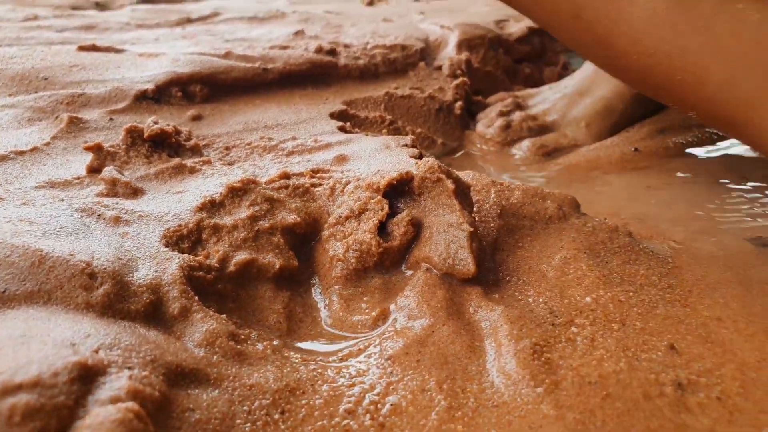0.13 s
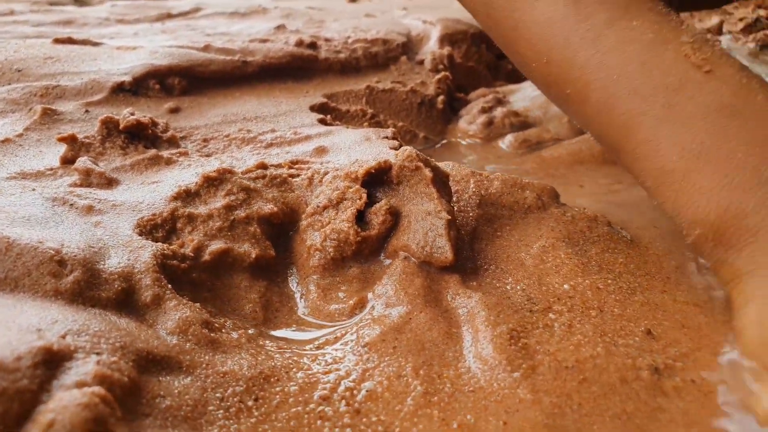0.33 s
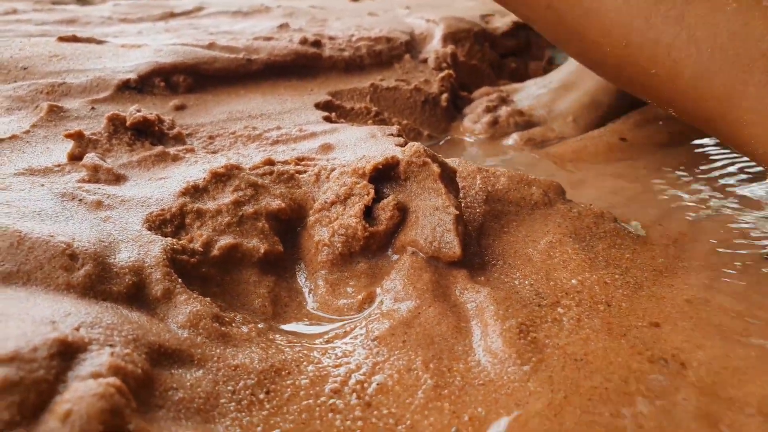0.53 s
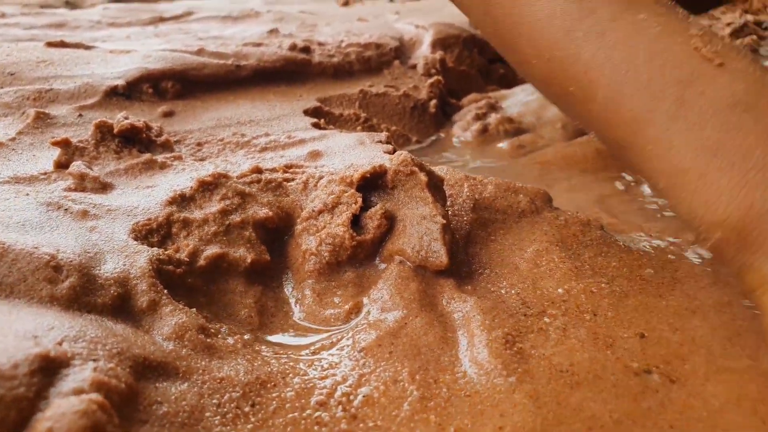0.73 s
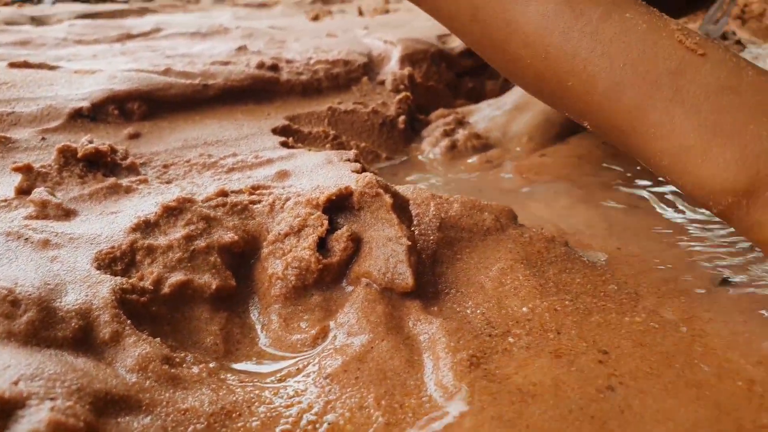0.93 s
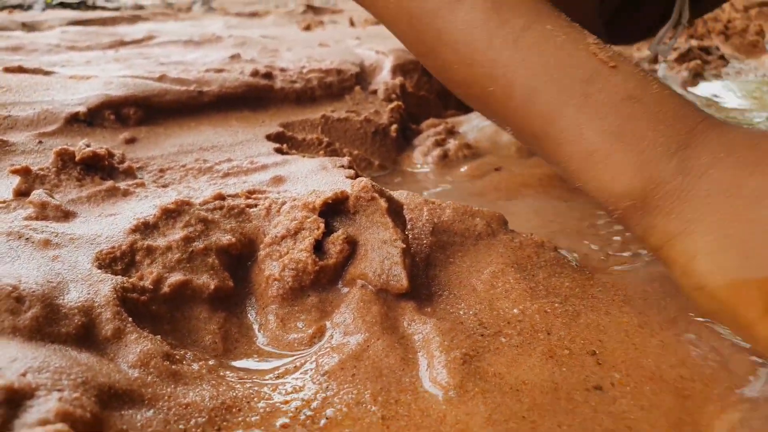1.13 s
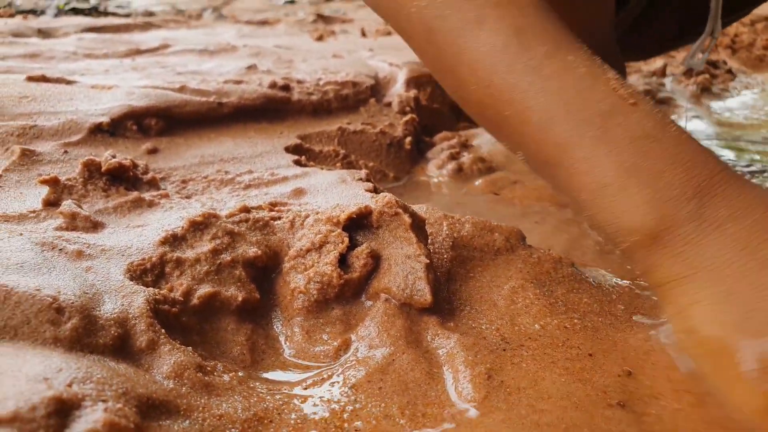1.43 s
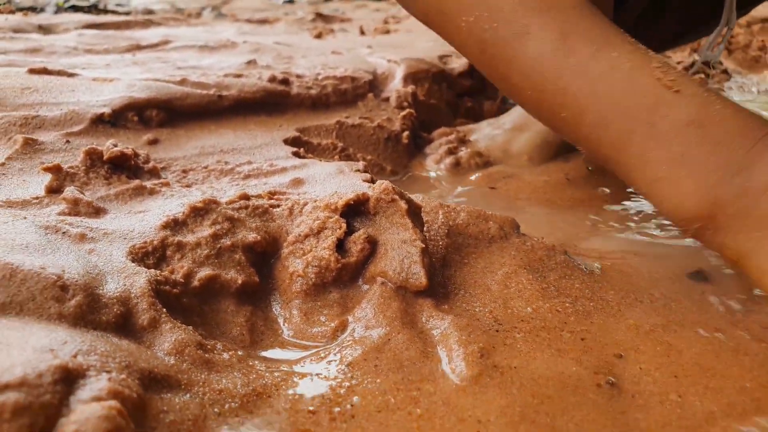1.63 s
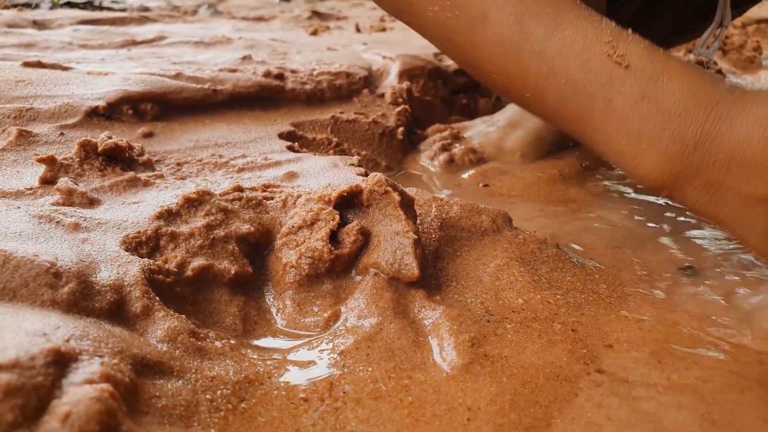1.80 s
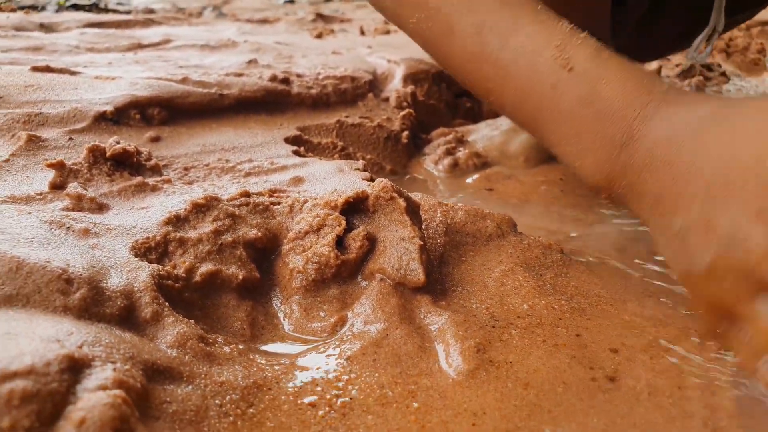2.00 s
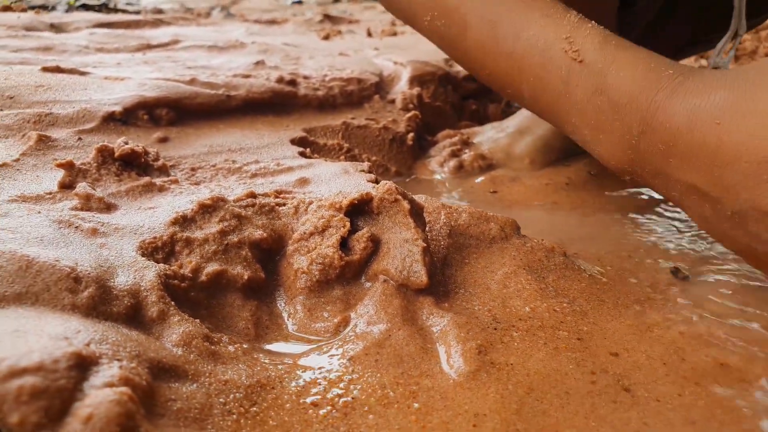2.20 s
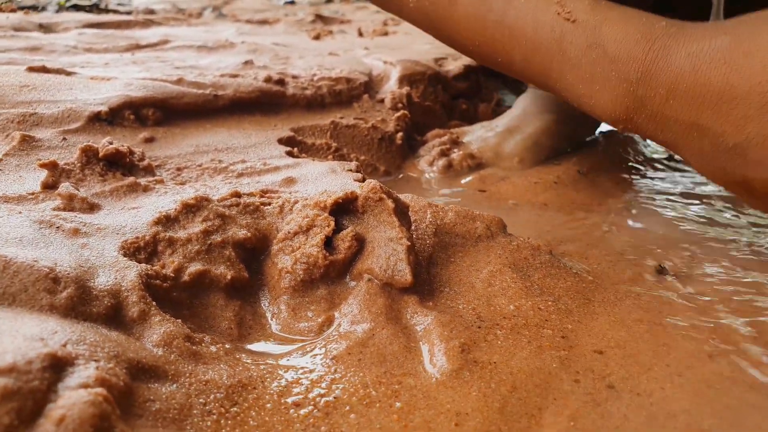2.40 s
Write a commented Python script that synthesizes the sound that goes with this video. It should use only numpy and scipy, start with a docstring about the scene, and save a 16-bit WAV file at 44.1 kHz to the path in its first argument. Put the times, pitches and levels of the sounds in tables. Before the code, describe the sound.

Hands scooping waterlogged sand, with sharp wet pops, squelches and sloshes over a steady insect drone

```python
"""Hands scooping waterlogged sand

Hands scoop to the right of a two-port microphone. Air pockets pop and gurgle as gliding sines, water films
tick as short noise bursts, and small bubbles, crackle and slosh follow each stroke. Near sounds reach the left
port late and scatter briefly. Insects drone all round: sparse clicks ringing in the singers' bands, noise bands
above. Behind lie coloured-noise hiss, a wavering low far rumble and one brief far swish.
"""
import sys
import numpy as np
from scipy import signal
from scipy.fft import rfft, irfft, next_fast_len
from scipy.io import wavfile
from scipy.ndimage import uniform_filter1d, map_coordinates

SR = 44100
rng = np.random.default_rng(int(sys.argv[2]) if len(sys.argv) > 2 else 0)


def field_ratio(decibels):
    """Amplitude ratio for a level in dB (20 dB per decade); scalars and array-likes work."""
    return 10 ** (np.asarray(decibels, dtype=float) / 20)


def master(y):
    """Save y as 16-bit WAV."""
    cut = np.clip(np.atleast_2d(y).T, -1, 1)
    pcm = np.round(cut * 32767)  # scale
    wavfile.write(sys.argv[1], SR, pcm.astype(np.int16))


N = 112454
LAG_SCATTER_S, GRAIN_SCATTER_DB = 0.00008, 2  # left port against right, from grain to grain


def unit(x):
    """Scaled to rms 1."""
    return x / np.sqrt(np.mean(x ** 2) + 1e-20)


def along(points, hz, ends=None):
    """(Hz, value) points interpolated on a log frequency axis."""
    f, v = np.transpose(points)
    return np.interp(np.log(hz + 1), np.log(f + 1), v, ends, ends)


def curves(rows):
    """One value per sample for each column after the time."""
    s, *cols = np.transpose(rows)
    return [np.interp(np.arange(N) / SR, s, c) for c in cols]


def wobble(rate_hz):
    """A smooth random curve with rate_hz knots a second."""
    knots = rng.standard_normal(int(N * rate_hz / SR) + 4)
    return map_coordinates(knots, [np.arange(N) * rate_hz / SR])


def filtered(x, response):
    """x through a response given as a function of Hz."""
    m = next_fast_len(N + 8192)
    return irfft(rfft(x, m) * response(np.fft.rfftfreq(m, 1 / SR)), m)[..., :N]


def coloured(x, spectrum):
    """x through a (Hz, dB) spectrum closed at both ends."""
    return filtered(x, lambda hz: field_ratio(along(spectrum, hz, ends=-120)))


def sides(left_db):
    """Left and right gains of constant total power, left_db apart."""
    g = field_ratio(left_db)
    return np.array([g, np.ones_like(g)]) * np.sqrt(2 / (1 + g * g))


def pair(x, alike, left_db):
    """Two unrelated signals blended to a likeness and a balance, both by frequency."""
    def turn(hz):
        return np.arccos(np.clip(along(alike, hz), -1, 1)) / 2
    a, b = filtered(x, lambda hz: np.array([np.cos(turn(hz)), np.sin(turn(hz))]))
    return unit(filtered(np.array([a + b, a - b]), lambda hz: sides(along(left_db, hz))))


def place(s, grains):
    """Rows of samples summed at their times."""
    at = np.round(np.asarray(s) * SR).astype(int)[:, None] + np.arange(grains.shape[1])
    return np.bincount(at.ravel(), grains.ravel(), N)[:N]


def ports(s, grains):
    """Each grain reaches the left port at its own level and lag; both ports start LAG_SCATTER_S late."""
    lag, level = rng.uniform(-1, 1, (2, len(s)))
    left = place(s + LAG_SCATTER_S * (1 + lag), grains * field_ratio(GRAIN_SCATTER_DB * level)[:, None])
    right = place(s + LAG_SCATTER_S, grains)
    return np.array([left, right])


POP_BEND = 1.33  # exponent above 1: glides steepen late
POP_RISE_CYCLES, POP_CRACK_DB, POP_CRACK_S = 0.38, -22.5, 0.00063
POP_SHAPE, POP_ROUGH = 1.244, 0.36  # decay exponent and flutter depth of short pops
# long gurgles hold, cleaner, and stop short
POP_HOLD_FROM_S, POP_HOLD_FULL_S, POP_HOLD_SHAPE, POP_HOLD_ROUGH = 0.005, 0.011, 3.2, 0.15


def bubbles(start_hz, end_hz, length_s, size):
    """Gliding, uneven sines that start fast and fade over their length, each with a short dull crack."""
    t = np.arange(size)[None] / SR
    start = np.asarray(start_hz)[:, None]
    end = np.asarray(end_hz)[:, None]
    life = np.clip(length_s, 3e-4, 1)[:, None]
    glide = np.minimum(t / life, 1.2) ** POP_BEND
    cycles = np.cumsum(start + (end - start) * glide, 1) / SR
    held = np.clip((life - POP_HOLD_FROM_S) / (POP_HOLD_FULL_S - POP_HOLD_FROM_S), 0, 1)
    rough = POP_ROUGH + (POP_HOLD_ROUGH - POP_ROUGH) * held
    shape = POP_SHAPE + (POP_HOLD_SHAPE - POP_SHAPE) * held
    slow_noise = unit(uniform_filter1d(rng.standard_normal(cycles.shape), size=40, axis=1))
    flutter = 1 + rough * np.minimum(t / 0.003, 1) * slow_noise
    rise = 1 - np.exp(-cycles / POP_RISE_CYCLES)
    fade = np.exp(-1.4 * (t / life) ** shape)
    ring = np.sin(2 * np.pi * cycles) * fade * rise
    dull_noise = uniform_filter1d(rng.standard_normal(cycles.shape), size=5, axis=1)
    crack = dull_noise * np.exp(-t / POP_CRACK_S)
    return ring * flutter + field_ratio(POP_CRACK_DB) * crack


# Air pockets bursting. Each row: start in seconds, start pitch in Hz, end pitch in Hz, level in dB,
# length in seconds.
AIR_POCKETS = [(0.108, 318, 300, -44, 0.02), (0.2207, 1563, 2320, -32, 0.02),
               (0.245, 4400, 4470, -31.5, 0.0021), (0.2587, 4560, 4500, -26, 0.0047),
               (0.2832, 1720, 2487, -22.5, 0.018), (0.2883, 4860, 4250, -15.5, 0.0015),
               (0.301, 4100, 4420, -27, 0.002), (0.381, 2130, 2150, -33.5, 0.0024),
               (0.4353, 2790, 2250, -0.5, 0.00077), (0.4359, 6115, 5840, -11.5, 0.0067),
               (0.4381, 2700, 2326, -13, 0.0022), (0.4394, 3920, 3280, -6.5, 0.0014),
               (0.4398, 4920, 4740, -13.5, 0.0027), (0.446, 5860, 5370, -5.5, 0.0013),
               (0.4466, 2650, 2350, -21.5, 0.0032), (0.512, 3200, 2660, -16, 0.0018),
               (0.5165, 2490, 1900, -26.5, 0.0041), (0.52, 4200, 4270, -23.5, 0.0018),
               (0.539, 3570, 4080, -30.5, 0.0045), (0.545, 6200, 5650, -19.5, 0.0025),
               (0.566, 3400, 3500, -36, 0.0047), (0.5965, 3340, 3460, -29.5, 0.0031),
               (0.6009, 6850, 6300, -23.5, 0.0032), (0.614, 6020, 5260, -11.5, 0.0015),
               (0.641, 2060, 1980, -29.5, 0.011), (0.65, 3770, 3970, -27.5, 0.0035),
               (0.66, 308, 314, -41, 0.016), (0.68, 3440, 3000, -32, 0.002),
               (0.6935, 6100, 6070, -26, 0.0017), (0.6984, 3360, 2900, -27, 0.003),
               (0.717, 2130, 2080, -41, 0.014), (0.7175, 3660, 3440, -33, 0.0018),
               (0.7304, 2500, 2090, -29, 0.0052), (0.795, 2250, 2220, -28, 0.0016),
               (0.828, 6020, 5380, -16, 0.0039), (0.8347, 3300, 2640, -18, 0.003),
               (0.8358, 2250, 2150, -27, 0.002), (0.8353, 5600, 5800, -12.5, 0.0004),
               (0.8874, 1960, 1900, -18, 0.0011), (0.8911, 1470, 1370, -6.5, 0.00059),
               (0.8918, 3000, 2630, -18.5, 0.00087), (0.8912, 676, 546, -24.5, 0.012),
               (0.904, 310, 325, -31.5, 0.022), (0.9243, 326, 264, -35.5, 0.013),
               (0.971, 4340, 4160, -27.5, 0.002), (1.159, 4240, 4320, -31.5, 0.0016),
               (1.1725, 1110, 1110, -35, 0.0053), (1.187, 1830, 1690, -28.5, 0.006),
               (1.192, 2100, 2130, -36, 0.0063), (1.257, 294, 330, -39.5, 0.021),
               (1.3366, 1510, 1880, -30.5, 0.0091), (1.3543, 1960, 2090, -16.5, 0.0019),
               (1.3577, 840, 450, -19, 0.00096), (1.386, 780, 745, -27, 0.0029),
               (1.3878, 1400, 1430, -11, 0.0035), (1.393, 1890, 3950, -17, 0.0031),
               (1.394, 636, 667, -35, 0.017), (1.406, 2450, 2480, -8, 0.0024),
               (1.468, 2040, 1640, -24, 0.0031), (1.5435, 6250, 5600, -21.5, 0.0026),
               (1.571, 1940, 1620, -18, 0.0037), (1.578, 5130, 4280, -13.5, 0.0011),
               (1.6015, 5880, 6060, -7.5, 0.0011), (1.62, 2720, 2470, -12.5, 0.0015),
               (1.6444, 2650, 2580, -31.5, 0.012), (1.6574, 3900, 3630, -28, 0.0037),
               (1.671, 570, 656, -39.5, 0.0078), (1.6741, 4830, 4100, -15.5, 0.0037),
               (1.698, 2660, 2700, -31.5, 0.0092), (1.7577, 1730, 1340, -27, 0.0024),
               (1.7617, 1840, 1270, -16.5, 0.0014), (1.7684, 6050, 5960, -16.5, 0.0014),
               (1.774, 4280, 4200, -25.5, 0.0034), (1.8058, 1710, 1550, -32, 0.0099),
               (1.8173, 1380, 1270, -33.5, 0.012), (1.8367, 1320, 1255, -38.5, 0.012),
               (1.8473, 3010, 3570, -12, 0.0026), (1.888, 1410, 1390, -40.5, 0.0097),
               (1.9094, 1410, 1430, -20.5, 0.0042), (1.9102, 3700, 3015, -16.5, 0.0012),
               (1.911, 2200, 2010, -19, 0.0057), (1.9252, 3160, 3380, -23, 0.0037),
               (1.94, 1690, 1870, -22, 0.0015), (1.9877, 4770, 4250, -16, 0.0018),
               (1.9878, 1930, 1936, -15, 0.0047), (1.988, 3390, 2880, -12.5, 0.0019),
               (2.0076, 4100, 3760, -23, 0.00056), (2.068, 3780, 3900, -18, 0.00077),
               (2.1769, 1270, 1620, -28, 0.011), (2.1889, 314, 310, -15.5, 0.0026),
               (2.1897, 720, 620, -21, 0.0036), (2.2026, 640, 504, -18, 0.0015),
               (2.2027, 3230, 4340, -19, 0.0027), (2.2032, 1700, 1870, 0.5, 0.001),
               (2.2047, 1114, 1200, -13, 0.0029), (2.2093, 5630, 6740, -17, 0.0018),
               (2.208, 390, 384, -29, 0.0052), (2.2205, 1500, 1447, -27, 0.0024),
               (2.2493, 1200, 1200, -23, 0.00092), (2.2501, 4900, 5440, 0, 0.001),
               (2.26, 2670, 1700, -17, 0.0016), (2.266, 4260, 4600, -33, 0.0056),
               (2.26, 5700, 5850, -15.5, 0.0014), (2.2604, 1205, 1110, -12.5, 0.0027),
               (2.2907, 3600, 3950, -15.5, 0.00038)]


def pockets():
    """Bursting air pockets that stand out, each a single gliding bubble."""
    s, start_hz, end_hz, db, length_s = np.transpose(AIR_POCKETS)
    grains = bubbles(start_hz, end_hz, length_s, size=3072) * field_ratio(db)[:, None]
    return ports(s - LAG_SCATTER_S, grains)


TICK_RISE_S, TICK_DECAY_S = 0.00047, 0.0009
TICK_WIDTH_HZ, TICK_BROAD_DB = 540, -7  # resonant band; broad part under it
# Colour of the broad part of a tick. Each row: frequency in Hz, gain in dB.
TICK_BROAD_COLOUR = [(1500, -75), (3000, -13), (6000, -0.5), (7600, -7.5), (9300, -4.5), (11500, 3.5),
                     (14000, -9), (16500, -41)]


def snaps(centre_hz):
    """Noise bursts, partly gathered round a centre by a resonance, peak 1."""
    size = 512
    t, f = np.arange(size) / SR, np.fft.rfftfreq(size, 1 / SR)
    envelope = np.exp(-t / TICK_DECAY_S) * (1 - np.exp(-t / TICK_RISE_S))
    burst = rng.standard_normal((len(centre_hz), size)) * envelope
    damping = 1j * f * TICK_WIDTH_HZ
    band = damping / (np.asarray(centre_hz)[:, None] ** 2 - f * f + damping)
    broad = field_ratio(TICK_BROAD_DB + along(TICK_BROAD_COLOUR, f))
    out = irfft(rfft(burst) * (band + broad), size)
    return out / np.abs(out).max(1, keepdims=True)


# Water films snapping. Each row: start in seconds, centre in Hz, level in dB.
FILM_TICKS = [(0.224, 9400, -24), (0.232, 11671, -27), (0.2399, 9600, -18.5), (0.257, 11100, -22.5),
              (0.2818, 10800, -23), (0.2887, 9700, -19.5), (0.327, 10465, -28.5), (0.3573, 8600, -26),
              (0.3813, 9300, -28), (0.4061, 10900, -15.5), (0.435, 11500, -21), (0.438, 11300, -17),
              (0.445, 11400, -14), (0.511, 12400, -27), (0.521, 8950, -33), (0.5398, 9100, -19),
              (0.556, 9000, -34), (0.5861, 11369, -23), (0.5994, 11900, -25), (0.6686, 11200, -24),
              (0.6974, 11100, -28), (0.73, 11600, -22), (0.7504, 11500, -20.5), (0.7703, 11400, -30),
              (0.7932, 12700, -20.5), (0.8231, 9900, -12.5), (0.828, 10500, -14), (0.8357, 11600, -28),
              (1.0508, 10200, -30), (1.3383, 10840, -13), (1.3435, 10400, -33), (1.362, 11300, -20.5),
              (1.387, 9300, -16), (1.406, 10500, -29), (1.548, 11500, -26), (1.572, 10700, -23.5),
              (1.576, 11800, -18), (1.6007, 11900, -11), (1.631, 13800, -31), (1.6764, 9700, -20.5),
              (1.688, 12800, -23), (1.7051, 9900, -22), (1.7675, 10400, -18), (1.843, 10000, -29),
              (1.8517, 10300, -22), (1.9112, 11300, -23), (1.9867, 10700, -21), (1.995, 11412, -26),
              (2.01, 11671, -29.5), (2.0565, 12300, -28), (2.068, 10700, -21), (2.102, 11500, -31),
              (2.1159, 9300, -28), (2.202, 9900, -16.5), (2.2085, 10900, -26), (2.242, 9400, -19.5),
              (2.249, 11900, -23.5), (2.2597, 12187, -27),]


def films():
    """Water films snapping, one bright noise burst each."""
    s, centre_hz, db = np.transpose(FILM_TICKS)
    return ports(s - LAG_SCATTER_S, snaps(centre_hz) * field_ratio(db)[:, None])


def fizz():
    """Fine random bubbles of log-normal pitch, a few of them much louder; rms 1."""
    per_s, middle_hz, spread, length_cycles, scatter_db = 500, 2700, 0.33, 8, 4.5
    count = int(per_s * N / SR)
    s = rng.random(count) * N / SR
    hz = np.clip(middle_hz * np.exp(spread * rng.standard_normal(count)), 1200, 7000)
    end_hz = hz * (1 + 0.13 * rng.standard_normal(count))
    level = field_ratio(-scatter_db * np.log(0.045 + rng.random((count, 1))))
    return unit(ports(s, bubbles(hz, end_hz, length_cycles / hz, size=1024) * level))


def crackle():
    """Random film snaps of scattered level; rms 1."""
    per_s, scatter_db = 130, 3.5
    count = int(per_s * N / SR)
    s = rng.random(count) * N / SR
    level = field_ratio(-scatter_db * np.log(rng.random((count, 1))))
    return unit(ports(s, snaps(rng.uniform(9000, 12500, count)) * level))


# Slosh spectrum. Each row: frequency in Hz, density in dB per Hz (relative).
SLOSH_COLOUR = [(300, -8), (1100, -9), (2400, -4.5), (4000, -3.5), (8000, -11.5), (16000, -23)]


def slosh():
    """Sparse grit impulses, simultaneous at both ports, coloured and unsteady in level."""
    grit_per_s = 2500
    grit = rng.standard_normal((2, N)) * (rng.random(N) < grit_per_s / SR)
    return unit(coloured(grit, SLOSH_COLOUR)) * field_ratio(3.3 * wobble(29.55))


FIZZ_DB, CRACKLE_DB, SLOSH_DB = -0.5, -16, -2  # against the stirring level
# Stirring of the wet sand. Each row: time in seconds, level in dB.
STIR_LEVEL = [(0, -63.5), (.2, -66), (.28, -48.5), (.44, -60.5), (.48, -69), (.54, -59.5), (.7, -56),
              (.77, -63), (.86, -48), (.99, -64.5), (1.1, -65), (1.19, -48), (1.29, -69), (1.4, -45.5),
              (1.52, -54), (1.7, -45), (1.82, -49), (2.01, -45), (2.12, -56.5), (2.23, -47.5), (2.34, -60),
              (2.45, -60), (2.55, -71)]


def stirring():
    """Fizz, crackle and slosh rise and fall together with the strokes."""
    stir_db, = curves(STIR_LEVEL)
    mix = field_ratio(FIZZ_DB) * fizz() + field_ratio(CRACKLE_DB) * crackle() + field_ratio(SLOSH_DB) * slosh()
    return field_ratio(stir_db) * mix


# Left port against right for near sounds. Each row: frequency in Hz, difference in dB.
NEAR_LEFT_DB = [(300, -9), (600, -18), (1400, -7.5), (2600, -17.5), (4200, -5), (6000, -23), (9000, 1.5),
                (10500, -10), (11800, -26), (16000, -39)]


def scooping():
    """Near sounds reach the left port late and scatter briefly off hands and ground."""
    left_lag_s, echo_db, echo_t60_s = 0.000274, -9, 0.037
    near = filtered(pockets() + films() + stirring(), lambda f: sides(along(NEAR_LEFT_DB, f)))
    lags_s = np.array([[left_lag_s], [0]])
    near = filtered(near, lambda f: np.exp(-2j * np.pi * f * lags_s))
    t = np.arange(SR // 10) / SR
    tail = rng.standard_normal((2, len(t))) * field_ratio(-60 * t / echo_t60_s)
    tail = tail / np.linalg.norm(tail, axis=1, keepdims=True)
    echo = signal.fftconvolve(near, tail, axes=1)[:, :N]
    return near + field_ratio(echo_db) * echo


# Insect levels. Each row: time in seconds, main band in dB, upper singers in dB.
CHORUS_LEVEL = [(0, -40.5, -61), (.45, -42.5, -54), (.9, -42.5, -68), (1.25, -40, -49), (1.6, -39, -72),
                (2.1, -38.5, -49.5), (2.4, -42, -56), (2.55, -43, -69)]
# Main band spectrum. Each row: frequency in Hz, density in dB per Hz (relative).
DRONE_COLOUR = [(4100, -45), (4500, -6.5), (4900, -3), (5400, 5), (5900, -2), (6250, -16), (6600, -7)]
# Upper singers' spectrum. Each row: frequency in Hz, density in dB per Hz (relative).
UPPER_COLOUR = [(6200, -25), (6500, -1.5), (6800, -10), (7200, -9)]
# Left port against right in the main band. Each row: frequency in Hz, difference in dB.
DRONE_LEFT = [(4600, -5.5), (5300, -2), (5900, -18), (6300, 1)]


def insects():
    """Many wing clicks, different at each port, ring in the main band; noise makes the upper singers."""
    clicks_per_s, upper_left_db = 4000, -8.5
    main_db, upper_db = curves(CHORUS_LEVEL)
    clicks = rng.standard_normal((2, N)) * (rng.random((2, N)) < clicks_per_s / SR)
    drone_db = main_db + 1.37 * wobble(30.15) + 1.52 * wobble(5.95)
    drone = unit(coloured(clicks, DRONE_COLOUR)) * field_ratio(drone_db)
    drone = filtered(drone, lambda f: sides(along(DRONE_LEFT, f)))
    upper = unit(coloured(rng.standard_normal((2, N)), UPPER_COLOUR))
    upper = upper * field_ratio(upper_db + 1.5 * wobble(12)) * sides(upper_left_db)[:, None]
    return drone + upper + thin_note()


def thin_note():
    """One thin insect note: a narrow noise band faded in and out."""
    start_s, end_s, fade_s = 1.75, 1.86, 0.014
    centre_hz, width_hz, db = 8600, 200, -53
    t = np.arange(N) / SR
    noise = rng.standard_normal((2, N))
    note = unit(filtered(noise, lambda f: np.exp(-((f - centre_hz) / width_hz) ** 2)))
    return note * field_ratio(db) * np.clip(np.minimum(t - start_s, end_s - t) / fade_s, 0, 1)


# Hiss spectrum. Each row: frequency in Hz, density in dB per Hz (relative).
AIR_COLOUR = [(150, -4), (420, -11.5), (1080, -24), (2400, -21.5), (3600, -29), (5500, -3), (7800, -25),
              (9400, -20), (11200, -11.5), (13000, -33), (15000, -33), (16500, -65)]
# Left port against right in the hiss. Each row: frequency in Hz, difference in dB.
AIR_LEFT_DB = [(100, -10.5), (700, -7), (1300, -2), (3000, -4), (6200, -9), (8500, 9), (10500, -2.5),
               (11500, -13), (12100, -24), (15000, -12)]
# Likeness of the ports in the hiss. Each row: frequency in Hz, correlation from 0 to 1.
AIR_LIKENESS = [(150, 0.6), (550, 0.6), (1600, 0.036)]
# Swell of the lower hiss. Each row: time in seconds, gain in dB.
AIR_LOW_GAIN = [(0, 1.5), (.5, -2), (.95, 2), (1.6, 1), (1.95, 1.5), (2.2, -4.5), (2.55, -2.5)]


def hiss():
    """Outdoor hiss: coloured noise whose lower part swells and sinks."""
    level_db, low_hz = -47.5, 1510
    air = pair(coloured(rng.standard_normal((2, N)), AIR_COLOUR), AIR_LIKENESS, AIR_LEFT_DB)
    air = air * field_ratio(level_db)
    low = filtered(air, lambda f: 1 / (1 + (f / low_hz) ** 4))
    gain_db, = curves(AIR_LOW_GAIN)
    return air + (field_ratio(gain_db) - 1) * low


FAR_LEFT_DB = -8.5  # left port against right, rumble and swish
# Rumble spectrum. Each row: frequency in Hz, density in dB per Hz (relative).
RUMBLE_COLOUR = [(30, -32), (38, -6), (48, 1), (62, -1), (95, -5.5), (156, -16), (230, -22)]
# Rumble level. Each row: time in seconds, level in dB.
RUMBLE_DB = [(0, -40), (.3, -44), (.55, -45), (1.1, -44.5), (1.4, -41.5), (2.0, -44.5), (2.3, -44.5),
             (2.55, -46.5)]


def rumble():
    """Low far rumble: coloured noise, much alike at both ports, wavering in level."""
    noise = coloured(rng.standard_normal((2, N)), RUMBLE_COLOUR)
    low = pair(noise, alike=[(60, 0.88)], left_db=[(60, FAR_LEFT_DB)])
    level_db, = curves(RUMBLE_DB)
    return low * field_ratio(level_db + 3.64 * wobble(4.84))


# Brief far swish. In order: level in dB, then a spectrum. Each spectrum row: frequency in Hz,
# density in dB per Hz (relative).
FAR_SWISH = (-43, [(2200, -18), (2900, -5.5), (4400, 7), (7500, -10), (12000, -27)])


def swish():
    """One far swish: coloured noise under a half-sine swell."""
    start_s, end_s = 2.41, 2.48
    db, colour = FAR_SWISH
    progress = np.clip((np.arange(N) / SR - start_s) / (end_s - start_s), 0, 1)
    noise = unit(coloured(rng.standard_normal(N), colour))
    return noise * np.sin(np.pi * progress) * field_ratio(db) * sides(FAR_LEFT_DB)[:, None]


def scene():
    """Scooping close by, insects all round, outdoor background."""
    return scooping() + insects() + hiss() + rumble() + swish()


def roll_off(x):
    """The treble ends steeply here."""
    return signal.sosfilt(signal.butter(12, 16830, fs=SR, output="sos"), x)


def record(dry):
    """Band limit, then a hard ceiling at full scale."""
    top_hz = 16700
    limited = filtered(dry, lambda hz: hz < top_hz)
    mix = np.clip(limited, -1, 1)
    return roll_off(mix)


dry = scene()
out = record(dry)
master(out)
```